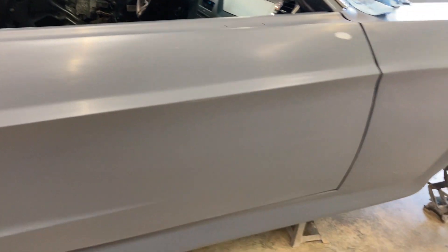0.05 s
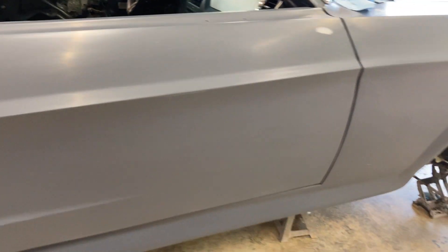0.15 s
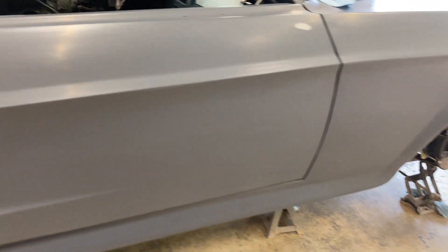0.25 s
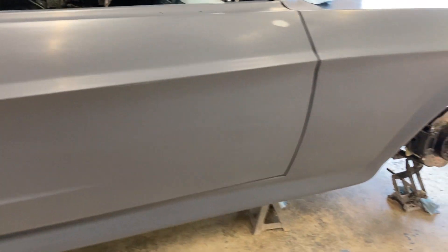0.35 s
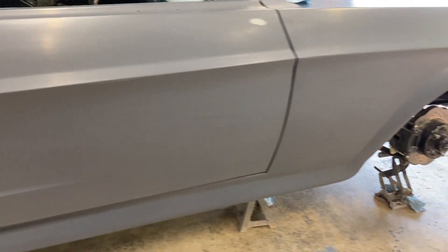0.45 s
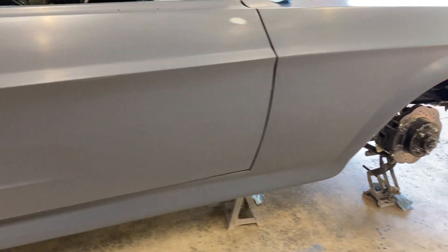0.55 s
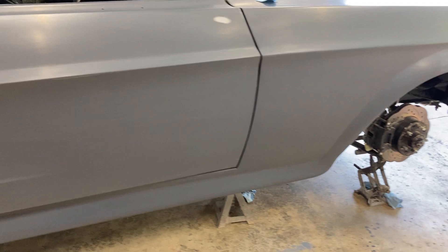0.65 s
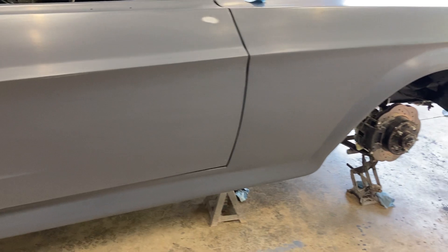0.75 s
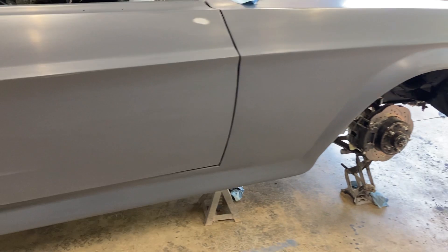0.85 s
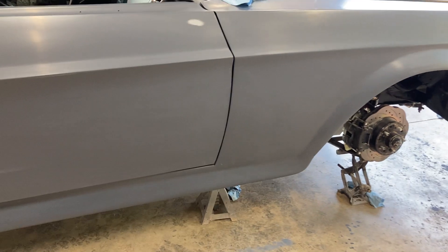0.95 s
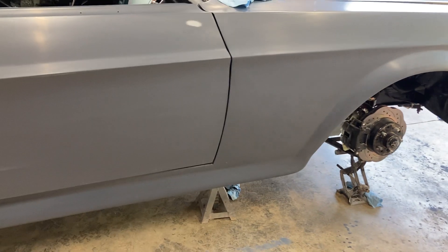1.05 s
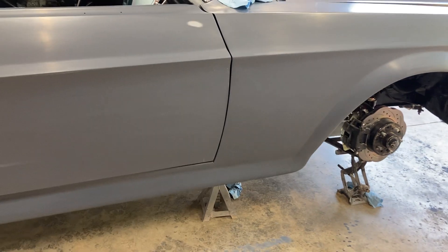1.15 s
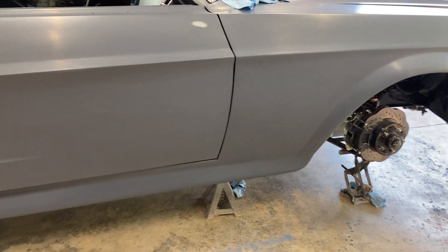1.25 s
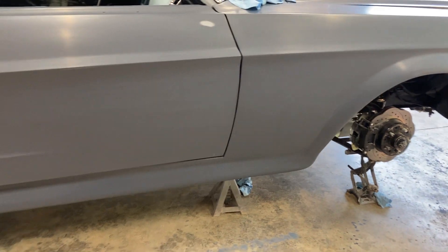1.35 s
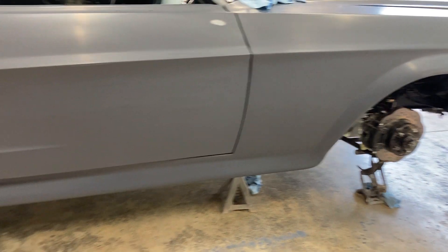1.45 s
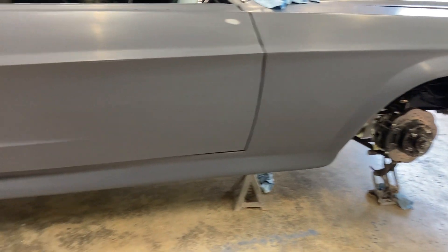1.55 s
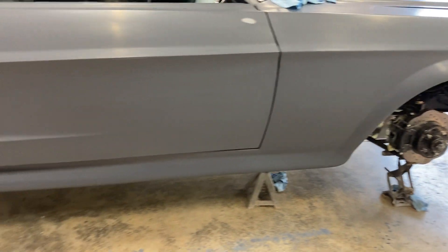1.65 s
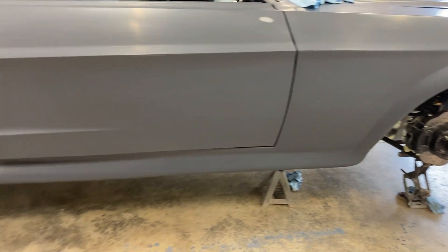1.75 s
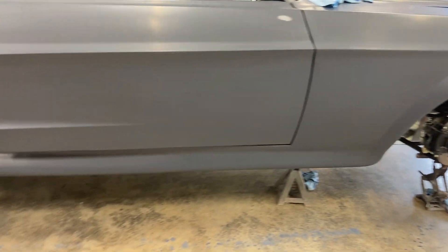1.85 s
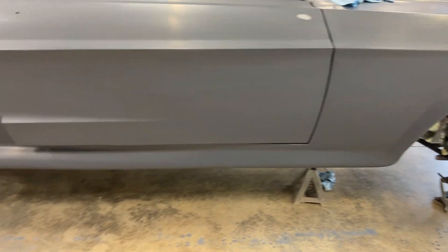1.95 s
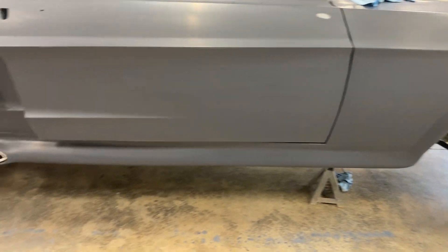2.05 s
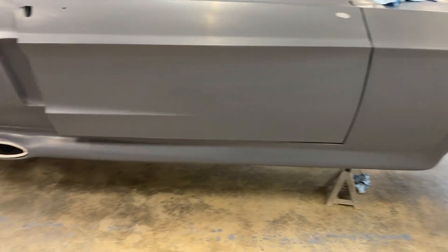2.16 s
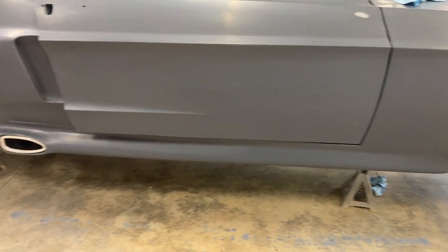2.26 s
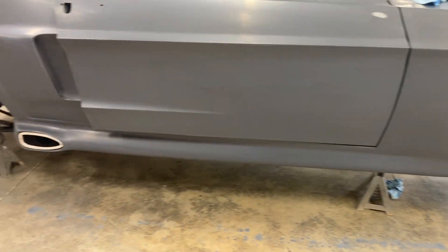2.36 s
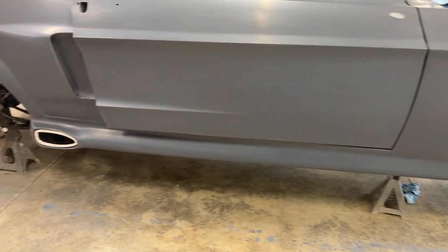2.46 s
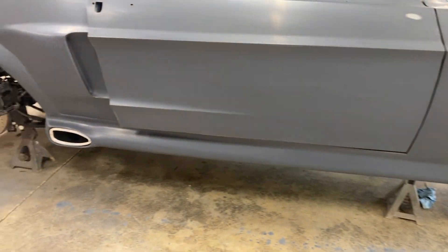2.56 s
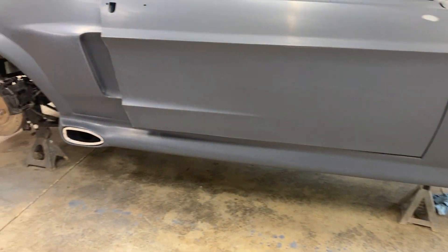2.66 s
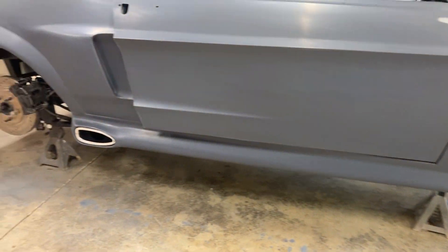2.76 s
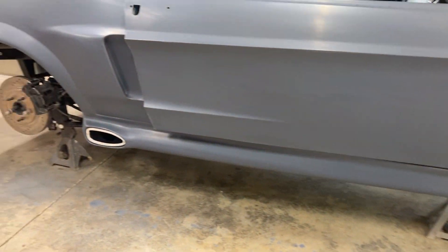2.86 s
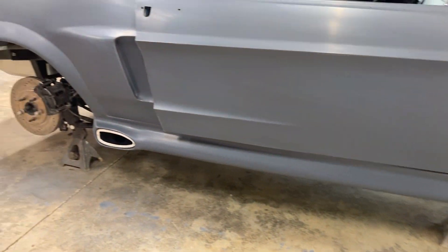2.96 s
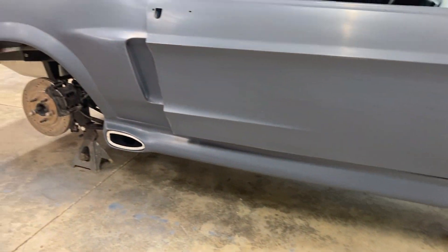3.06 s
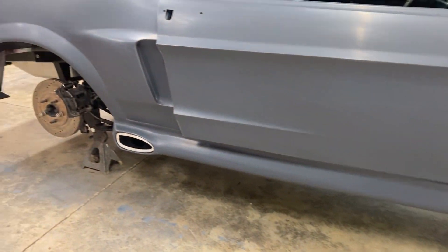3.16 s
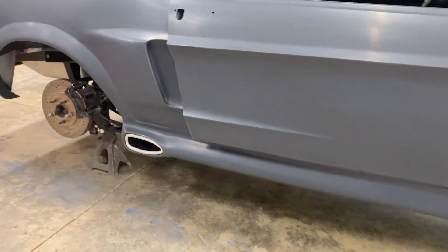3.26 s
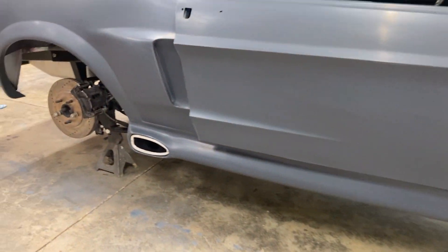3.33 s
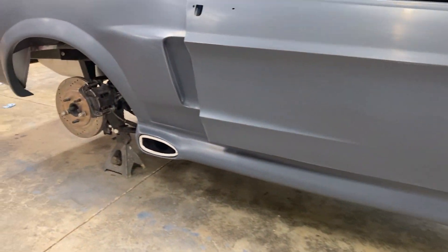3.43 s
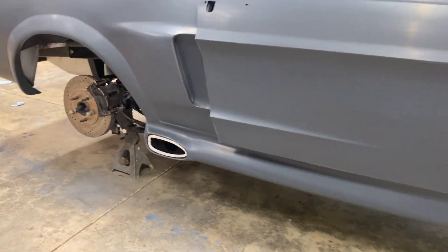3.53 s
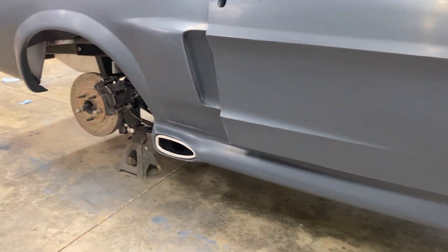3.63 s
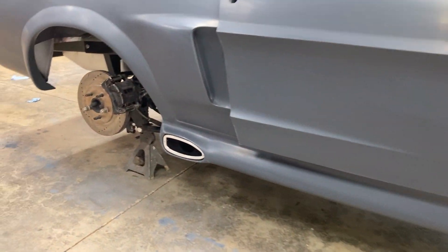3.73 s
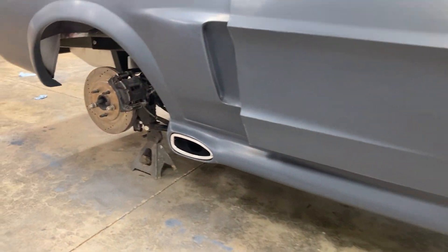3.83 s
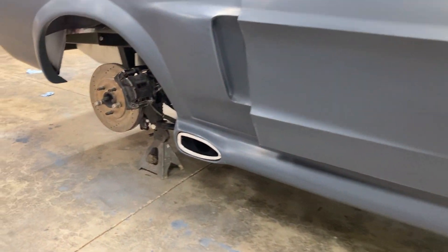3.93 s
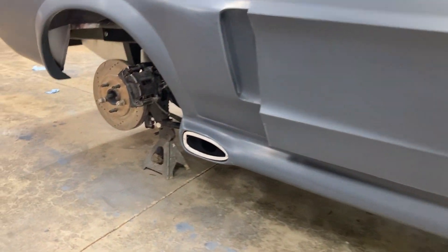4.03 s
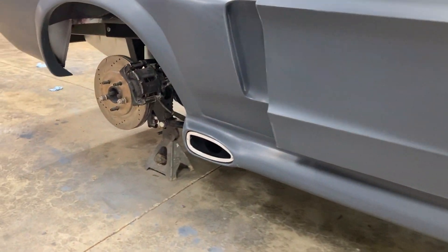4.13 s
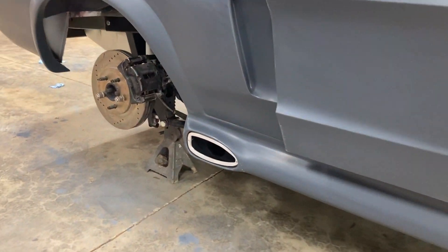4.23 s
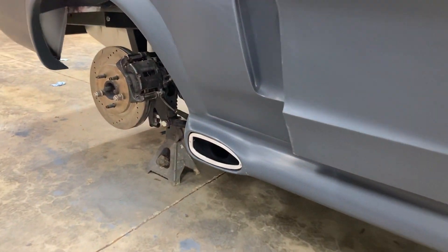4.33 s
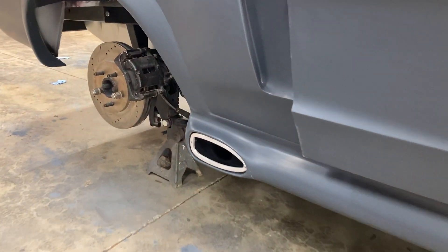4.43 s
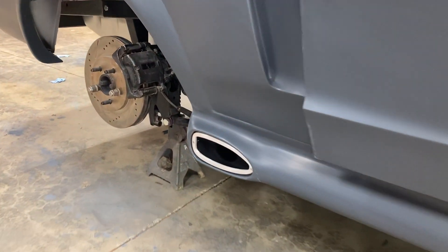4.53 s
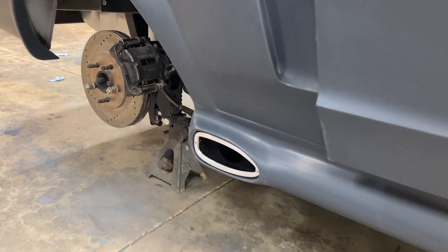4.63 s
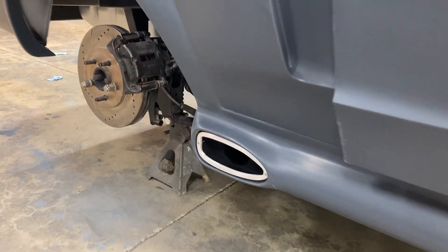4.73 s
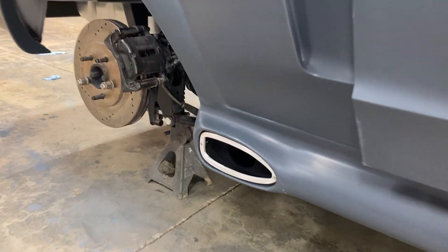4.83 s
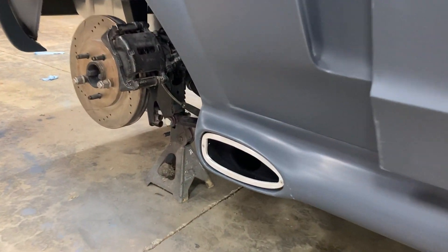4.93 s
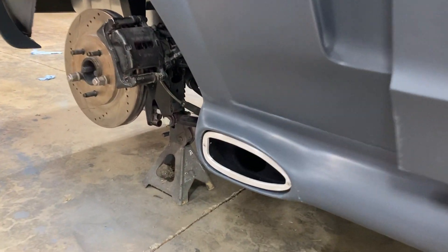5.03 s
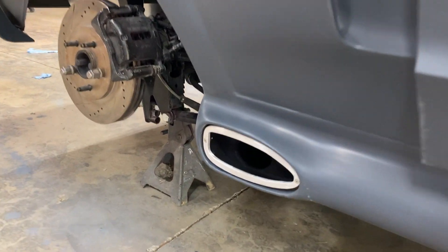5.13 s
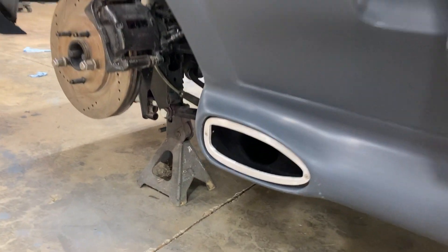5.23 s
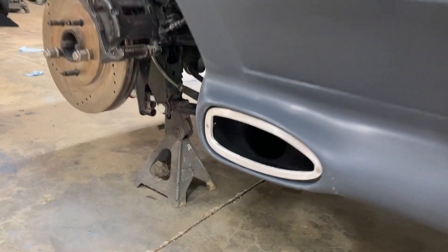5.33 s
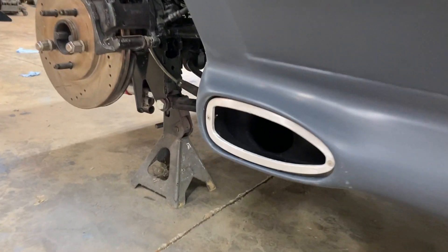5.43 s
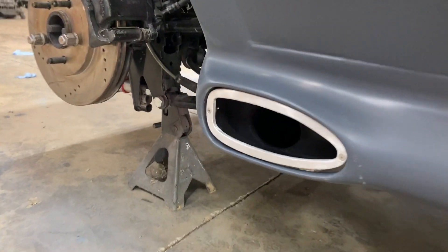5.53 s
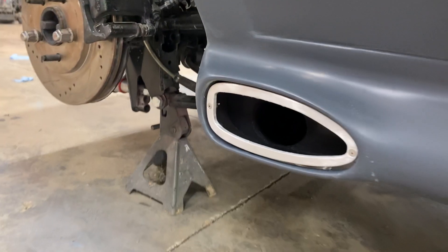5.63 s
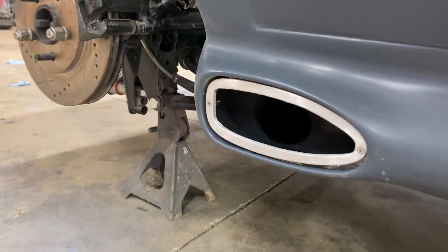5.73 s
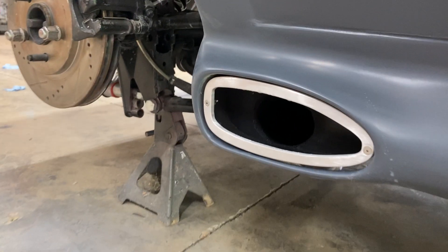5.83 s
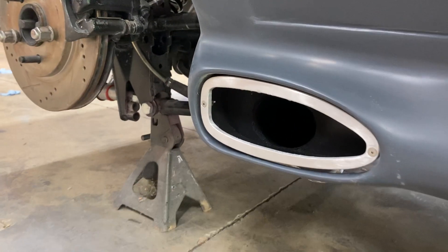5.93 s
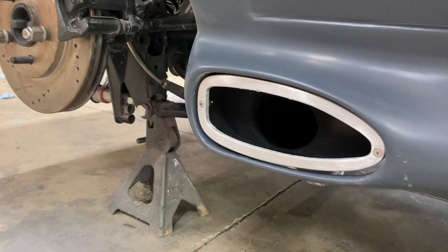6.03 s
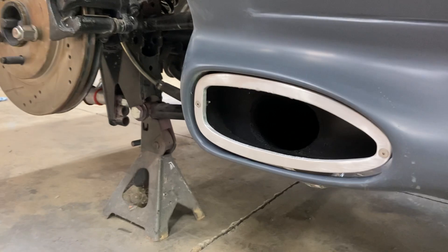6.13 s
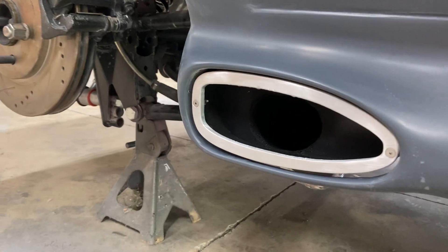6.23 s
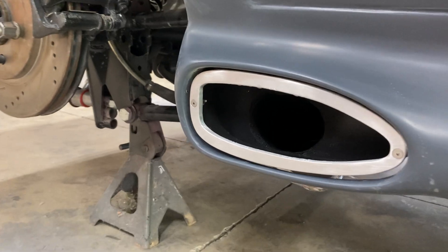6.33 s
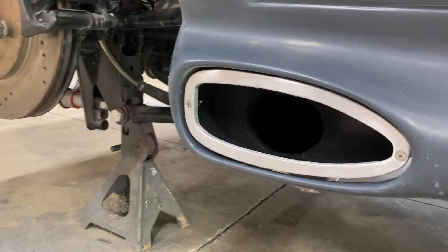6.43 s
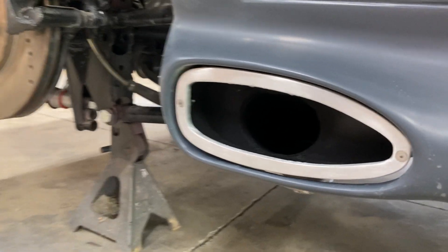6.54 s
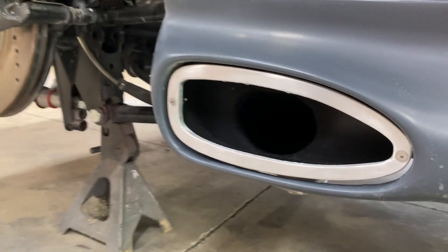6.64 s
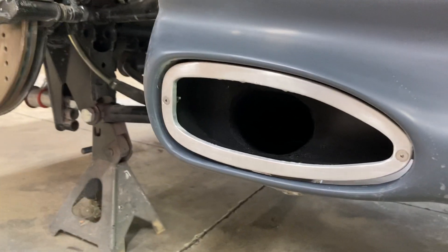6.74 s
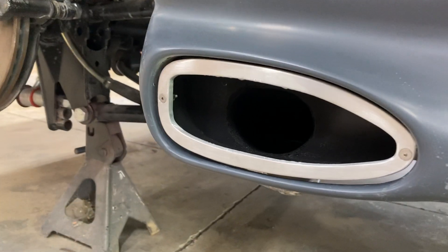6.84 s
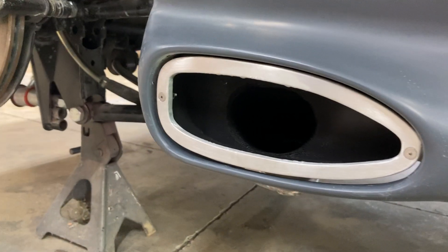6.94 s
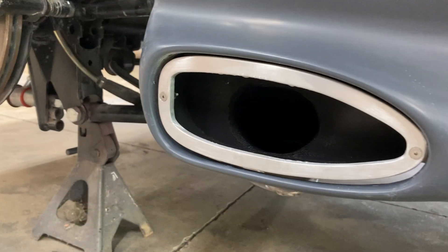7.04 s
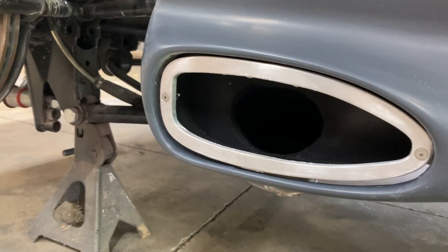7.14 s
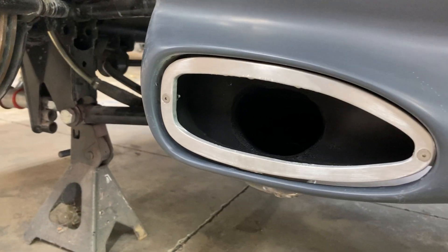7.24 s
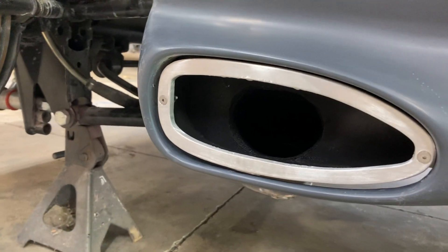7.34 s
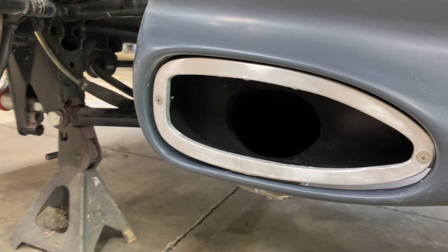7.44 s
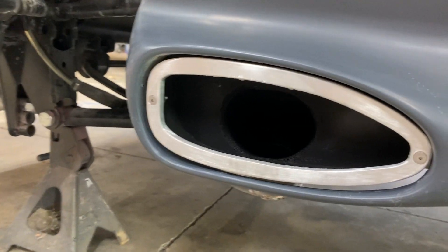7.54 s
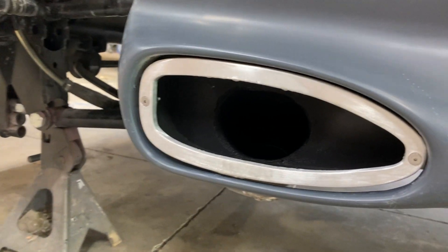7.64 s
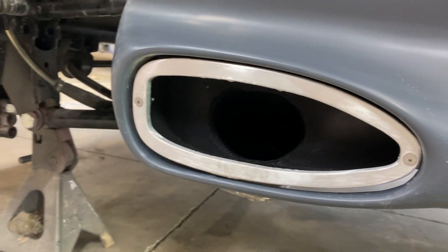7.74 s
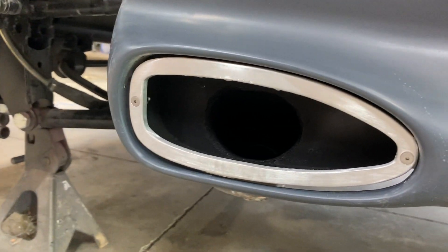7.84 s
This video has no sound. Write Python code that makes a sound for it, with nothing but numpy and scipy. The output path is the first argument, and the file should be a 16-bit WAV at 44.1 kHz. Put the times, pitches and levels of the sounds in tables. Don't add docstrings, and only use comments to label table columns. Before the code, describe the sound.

Uneven V8 idle, never revved, hunting slightly in speed. At first the exhaust is a couple of metres away, a booming, lumpy drone mixed with engine clatter, thin whines and hiss in the room. The stereo microphone then walks up to the side tailpipe, and its direct burbling thump and breathy rasp overtake the mechanical noise and stay close.

```python
import sys
import numpy as np
from scipy import signal
from scipy.fft import rfft, irfft, next_fast_len
from scipy.io import wavfile
from scipy.ndimage import uniform_filter1d, map_coordinates

SR = 44100
rng = np.random.default_rng(int(sys.argv[2]) if len(sys.argv) > 2 else 0)


def to_wav(sig):
    pcm = np.clip(np.atleast_2d(sig), -1, 1) * 32767
    pcm = np.round(pcm).astype(np.int16)
    wavfile.write(sys.argv[1], SR, pcm.T)


def makeup_ratio(level_db):
    decades = np.asarray(level_db, float) / 20
    return 10 ** decades


N = 347508
IDLE_RPM = 787

CYLINDERS = [(0.66, 0.17, 1.14, 0.02), (0.77, 0.24, 0.67, 0.05), (1.37, 0.23, 0.46, -0.21),
             (1.31, 0.09, 1.05, -0.18), (1.14, 0.15, 1.55, -0.08), (0.39, 0.21, 0.69, -0.0),
             (1.03, 0.04, 0.77, 0.1), (0.85, 0.31, 1.07, -0.08)]


def boom(cycle):
    thump = (-34.5, 0.5, -1.5, -32.5, -1.1)
    drone = (-36, 3, -2.3, -30, 3)
    throb = (-22.5, 0.5, 1.6, -24.5, 0.15)
    agreement = [.1, -0.62, 0.063]
    # f/Hz, width/Hz, level/dB
    hall = [(43, 22, -14.5), (105, 9, -15), (160, 35, -10)]
    # middle order, width/orders, slope/(dB per 10 rpm)
    surge = (24.5, 1.85, 4.7)
    drift, drift_hz = .23, 4
    roughness = [.08, .1, .06]

    near = near_share()
    steps = speed_steps()
    (order, far_pipe), (_, near_pipe) = pipe_orders(0), pipe_orders(1)
    group = np.digitize(order, [12, 19])
    middle, wide, surge_db = surge
    waves = np.zeros((3, N), complex)
    for k, g, far, close in zip(order, group, far_pipe, near_pipe):
        spin = np.exp(2j * np.pi * k * cycle)
        tuning = np.exp(-(2 * (k - middle) / wide) ** 2)
        gain = makeup_ratio(quiet_db(k) + surge_db * steps * tuning)
        wander = 1 + drift * g / 2 * (wobble(drift_hz) + 1j * wobble(drift_hz))
        waves[g] += (far + near * (close - far)) * spin * gain * wander

    out = 0
    layers = zip(waves, [thump, drone, throb], agreement, hall, roughness)
    for wave, layer, agree, (hz, width_hz, rumble_db), rough in layers:
        tone = even((wave * (1 + rough * (wobble(11) + 1j * wobble(14)))).real)
        noise = rng.standard_normal((2, N))
        rumble = unit(filtered(noise, lambda f: resonances([(hz, width_hz, 0)], f) ** 2))
        bedded = even(tone + makeup_ratio(rumble_db) * spread(rumble, [(100, 0.86)]))
        out = out + heard(layer, agree) * bedded
    return out


def pipe_orders(side):
    # far f/Hz, far width/Hz, near f/Hz, near width/Hz
    pipe = [(62, 21, 41, 57), (112, 16, 93, 12), (127, 76, 181, 59)]
    # multiple of the cycle rate, far level/dB, near level/dB
    order_levels = [(5, -46, -54), (6, -13, -31), (7, -9, -23.5), (8, -3.5, -15.5), (9, -61, -29.5),
                    (10, -29, -31), (11, -17, -30), (12, -56, -29), (13, -31, -33), (14, -22, -28),
                    (15, -25.5, -34), (16, -7, -9.5), (17, -23, -66), (18, -27.5, -20), (19, -42, -16.5),
                    (20, -23, -19), (21, -24, -15), (22, -7.5, -9.5), (23, -21, -13.5), (24, -7, -6.5),
                    (25, -25, -7.5), (26, -5, -9), (27, -12, -27), (28, -27, -14), (29, -22, -17.5),
                    (30, -14.5, -17.5), (31, -15, -20), (32, -21, -18), (33, -25, -27.5),
                    (34, -27.5, -26.5)]
    order, level_db = np.transpose(order_levels)[[0, 1 + side]]
    columns = slice(2 * side, 2 * side + 2)
    size, late = np.transpose(CYLINDERS)[columns]
    at = (np.arange(len(size)) + late) / len(size)
    firings = size @ np.exp(-2j * np.pi * np.outer(at, order))
    cycle_hz = 6.55
    ring = resonances([(*row[columns], 0) for row in pipe], order * cycle_hz)
    return order, makeup_ratio(level_db) * np.exp(1j * np.angle(firings * ring))


def quiet_db(order):
    # t/s, half length/s, order, level/dB
    nodes = [
        (.3, .45, 26, -9),
        (2.6, .5, 24, -4),
        (2.6, .45, 22, -5),
        (2.2, 1.1, 30, -5),
        (5.9, .3, 26, -6),
        (6.9, .3, 26, -6),
    ]
    t = np.arange(N) / SR
    return sum(db * np.exp(-((t - s) / half_s) ** 2) for s, half_s, k, db in nodes if k == order)


def bark(cycle):
    # f/Hz, width/Hz, far level/dB, near level/dB
    tip = [(255.7, 17.6, -1, -5.5), (299.6, 12, 1.5, -4.5), (329.7, 23.8, -0.5, -1), (496.9, 14, 1.5, 0),
           (627.8, 25.3, -10, -8), (666, 26.6, -9, -7), (701, 26, -14.5, -10.5), (829, 33, -22.5, -14.5),
           (944, 49, -28.5, -19), (1145, 34, -31, -23), (1257, 11, -24, -19)]
    bark_layer = (-39.5, 1.3, .5, -37.5, 1.3)
    rasp_layer = (-48, 3, 1.6, -40, 1.45)
    gas_share = .66
    pulses, gas = firing_pulses(cycle), gas_noise(cycle)
    left = np.sqrt(1 - gas_share) * unit(pulses) + np.sqrt(gas_share) * gas[0]
    drive = np.array([left, gas[1]])

    def response(hz, side):
        modes = [(*row[:2], row[2 + side]) for row in tip]
        return resonances(modes, hz) / (1 + (225 / (hz + 1)) ** 12)

    rung = moving(drive, response)
    low = filtered(rung, lambda hz: 1 / (1 + (hz / 420) ** 12))
    return heard(bark_layer) * even(low) + heard(rasp_layer) * even(rung - low)


def firing_pulses(cycle, jitter_s=.00025, scatter_db=2):
    size, late = np.transpose(CYLINDERS)[2:]
    n = np.arange(int(cycle[-1] * len(size)) - 1)
    cylinder = n % len(size)
    chance = rng.standard_normal((len(n), 2))
    at = np.interp((n + late[cylinder]) / len(size), cycle, np.arange(N)) + jitter_s * SR * chance[:, 0]
    strength = size[cylinder] * makeup_ratio(scatter_db * chance[:, 1])
    return np.bincount(np.clip(at, 0, N - 1).astype(int), strength, N)


def gas_noise(cycle):
    once = .12 * np.cos(2 * np.pi * (cycle - .3))
    thrice = .16 * np.cos(6 * np.pi * (cycle - .11))
    return (1 + once + thrice) * patchy(patchy_db=0.95)


def bay(cycle):
    wide = spread(rattle(cycle) + whines(cycle), [(900, 0.28), (3000, 0.2)])
    airy = spread(hiss(cycle) + ticks(cycle), [(5000, 0.72), (9000, 1.0)])
    return wide * makeup_ratio([[.45], [-.45]]) + airy


def rattle(cycle):
    # f/Hz, level/dB per Hz
    rattle_bands = [(410, -6.5), (700, 3), (759, -4), (830, 1), (1190, -4), (1300, -6.5), (2170, -10),
                    (3030, -11.5), (4190, -18.5), (6000, -27.5), (7800, -59), (13200, -120)]
    # f/Hz, width/Hz, far level/dB, near level/dB
    panels = [(1126, 24, 1, 4.5), (1355, 44, 8.5, 5.5), (1476, 31, 6.5, 6), (1770, 47, 8, 5.5),
              (2033, 64, 5.5, 3), (2376, 220, 5, 2), (3070, 100, -0.5, 4.5), (3350, 110, -0.5, 5),
              (5280, 1350, 4.5, 4)]
    clatter = (-50, 0.85, -0.4, -64, -.4)

    def response(hz, side):
        panels_db = sum(row[2 + side] / (1 + (2 * (hz - row[0]) / row[1]) ** 2) for row in panels)
        return makeup_ratio(along(rattle_bands, hz) + panels_db)

    swell_db = 10.0 + 0.4 * wobble(9.2) + 0.16 * np.cos(2 * np.pi * (cycle - .45))
    return even(moving(patchy(patchy_db=2.0), response)) * heard(clatter) * makeup_ratio(swell_db)


def whines(cycle):
    # t/s, half length/s, f/Hz at mean idle, width/Hz, level/dB
    belts = [
        (1.5, 0.93, 1720, 10, -56),
        (5.5, 0.66, 1707, 9, -58),
        (6.8, .25, 1707, 7.3, -60),
        (1.3, 2.5, 3730, 25, -62.5),
        (3.75, 0.47, 3780, 18, -57.5),
        (6.25, 0.74, 3780, 24, -55),
        (7.4, 0.58, 3795, 23, -61),
        (7.6, 0.46, 3270, 28, -61),
    ]
    t, out = np.arange(N) / SR, 0
    idle_s = cycle * 2 * 60 / IDLE_RPM
    for s, half_s, hz, width_hz, level_db in belts:
        fuzz = np.array([0.93 + wobble(width_hz) + 1j * wobble(width_hz) for channel in range(2)])
        tone = unit((fuzz * np.exp(2j * np.pi * hz * idle_s)).real)
        out = out + makeup_ratio(level_db) * np.exp(-((t - s) / half_s) ** 2) * tone
    return out


def hiss(cycle):
    # f/Hz, level/dB per Hz
    hiss_bands = [(2500, -42), (3600, -4), (5000, -7.5), (7500, 2.5), (11000, 0.5), (15000, -0.5)]
    intake = (-53, -0.57, 0.3, -76, 6)
    swell_db = 7.0 + 0.29 * wobble(2.33) + .5 * np.cos(2 * np.pi * (cycle - .3))
    air = unit(filtered(patchy(patchy_db=2.0), lambda hz: makeup_ratio(along(hiss_bands, hz))))
    return air * heard(intake) * makeup_ratio(swell_db)


def ticks(cycle):
    # position/cycles, level/dB
    tick_rows = [
        (.12, 2),
        (.51, 7.5),
        (.62, -18),
    ]
    valves = (-56, -0.04, -0.7, -90, .1)
    flare = 0
    for share, db in tick_rows:
        turn = cycle - share
        nearest = np.round(turn)
        strength = makeup_ratio(db + 1.8 * rng.standard_normal(int(cycle[-1]) + 3))
        flare = flare + strength[nearest.astype(int) + 1] * np.exp(-((turn - nearest) / .055) ** 2)
    noise = flare * rng.standard_normal((2, N))
    rung = filtered(noise, lambda hz: resonances([(7860.0, 2500.0, 0)], hz) ** 2)
    return unit(rung) * heard(valves) * makeup_ratio(-3.5)


def heard(layer, agree=0):
    # t/s, distance/m
    walk = [
        (0.0, 2.67),
        (1.6, 3.4),
        (2.4, 2.17),
        (3.5, 1.3),
        (4.5, 0.77),
        (5.2, 0.54),
        (5.9, 0.34),
        (6.4, 0.34),
        (6.9, 0.27),
        (7.88, 0.25),
    ]
    shop_db, db_per_m, shop_db_per_step, tip_db, tip_db_per_step = layer
    distance_m, steps = curve(walk), speed_steps()
    shop = makeup_ratio(shop_db + db_per_m * distance_m + shop_db_per_step * steps)
    tip = makeup_ratio(tip_db + tip_db_per_step * steps) / distance_m
    return np.sqrt(shop ** 2 + tip ** 2 + 2 * agree * shop * tip)


def near_share():
    # t/s, near share 0-1
    nearness = [
        (0, 0.3),
        (2.8, 0.04),
        (3.6, 0.6),
        (4.4, 0.87),
        (5.2, 1),
        (7.88, 1),
    ]
    return curve(nearness)


def engine_rpm():
    # t/s, speed/rpm
    idle = [(0.0, 785.2), (0.8, 785.7), (1.3, 793.5), (1.8, 802.7), (2.3, 788.3), (3.2, 783.7),
            (4.2, 791.9), (4.9, 779.3), (5.45, 789.9), (6.05, 766.0), (6.75, 791.3), (7.1, 773.0),
            (7.4, 789.8), (7.88, 785.7)]
    return curve(idle)


def speed_steps(settle_s=.27):
    return uniform_filter1d(engine_rpm() - IDLE_RPM, int(settle_s * SR)) / 10


def moving(pair, response):
    both = lambda hz: np.array([response(hz, 0), response(hz, 1)])[:, None]
    far_side, near_side = filtered(pair, both)
    return far_side + near_share() * (near_side - far_side)


def spread(pair, alike):
    # f/Hz, phase/rad
    lag = [(0, 0), (1030, 0), (1720, 2), (3100, 4), (5170, 9.2), (6900, 12.57), (15750, 25.13)]

    def mix(hz):
        turn = np.arccos(np.clip(along(alike, hz), 0, 1)) / 2
        return np.array([np.cos(turn), np.sin(turn)])

    def delay(hz):
        return np.exp(.5j * np.outer([-1, 1], np.interp(hz, *np.transpose(lag))))

    mid, side = filtered(pair, mix)
    return filtered(np.array([mid + side, mid - side]), delay)


def patchy(patchy_db):
    z = signal.stft(rng.standard_normal((2, N)), nperseg=1024)[2]
    field = uniform_filter1d(rng.standard_normal(z.shape[1:]), size=3, axis=0)
    field = uniform_filter1d(field, size=6, axis=1)
    return signal.istft(z * makeup_ratio(patchy_db * unit(field)), nperseg=1024)[1][:, :N]


def resonances(modes, f):
    total = 0
    for k, (c, w, db) in enumerate(modes):
        total = total + (-1) ** k * makeup_ratio(db) * 1j * f * w / (c * c - f * f + 1j * f * w)
    return total


def filtered(x, response):
    m = next_fast_len(N + SR // 2)
    return irfft(rfft(x, m) * response(np.fft.rfftfreq(m, 1 / SR)), m)[..., :N]


def wobble(rate_hz):
    coarse = np.arange(0, N + 64, 64)
    knots = rng.standard_normal(int(N * rate_hz / SR) + 4)
    return np.interp(np.arange(N), coarse, map_coordinates(knots, [coarse * rate_hz / SR]))


def curve(points):
    return np.interp(np.arange(N) / SR, *np.transpose(points))


def along(points, hz):
    f, v = np.transpose(points)
    return np.interp(np.log(hz + 1), np.log(f + 1), v)


def unit(x):
    return x / np.sqrt(np.mean(np.abs(x) ** 2) + 1e-20)


def even(x, seconds=0.51):
    return x / np.sqrt(np.abs(uniform_filter1d(x ** 2, int(seconds * SR), axis=-1)) + 1e-12)


def scene():
    cycle = .005 + np.cumsum(engine_rpm()) / (2 * 60 * SR)
    low = boom(cycle) * makeup_ratio([[.9], [-.9]])
    upper = spread(bark(cycle), [(300, 0.97), (650, 0.87)]) * makeup_ratio([[-.4], [.4]])
    return low + upper + bay(cycle)


def roll_off(x):
    return signal.sosfilt(signal.butter(12, 17060, fs=SR, output="sos"), x)


def record(dry):
    soft = dry / (1 + np.abs(dry / .98) ** 5) ** (1 / 5)
    mix = filtered(soft, lambda hz: hz < 15750)
    return roll_off(mix)


dry = scene()
out = record(dry)
to_wav(out)
```